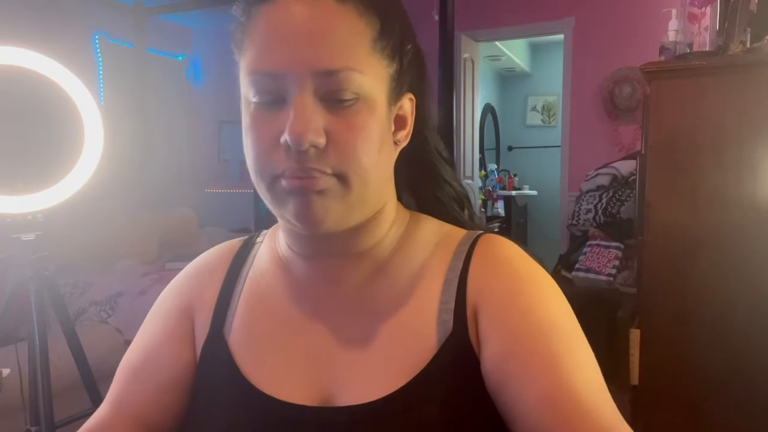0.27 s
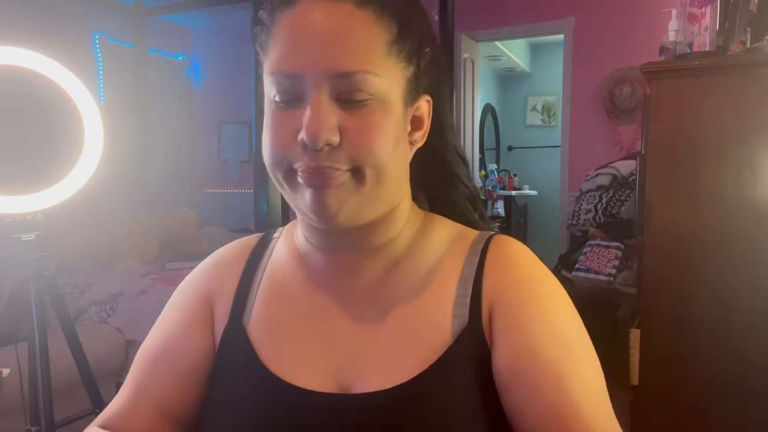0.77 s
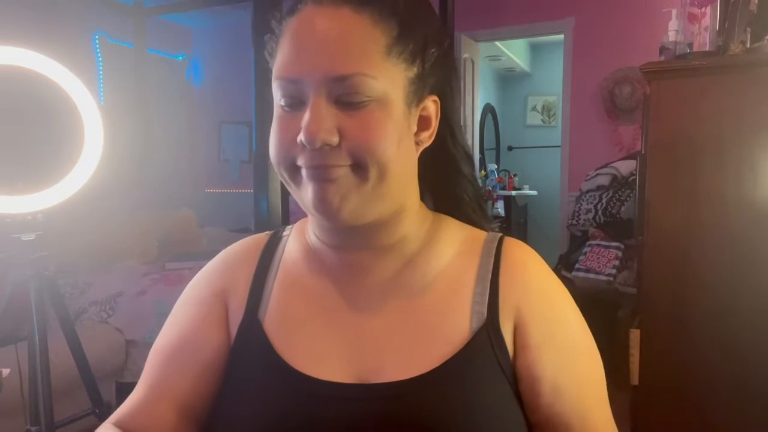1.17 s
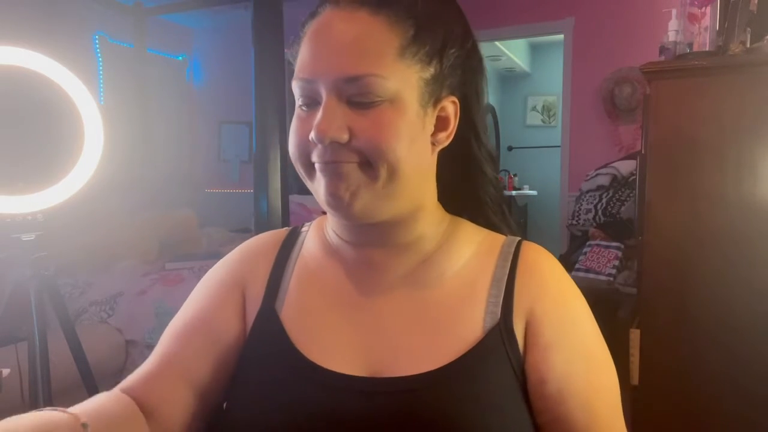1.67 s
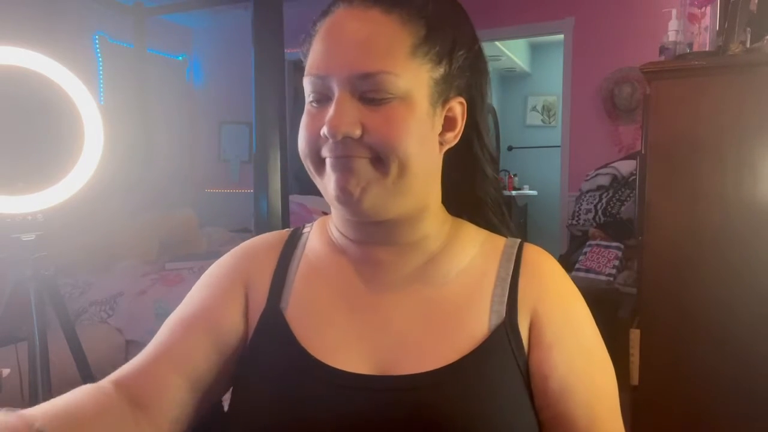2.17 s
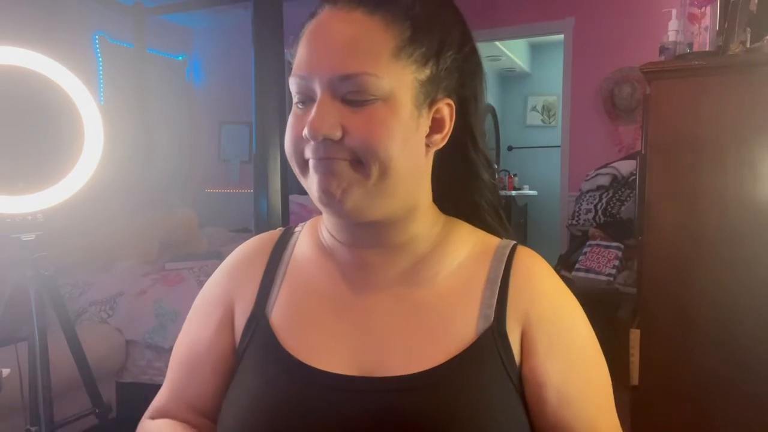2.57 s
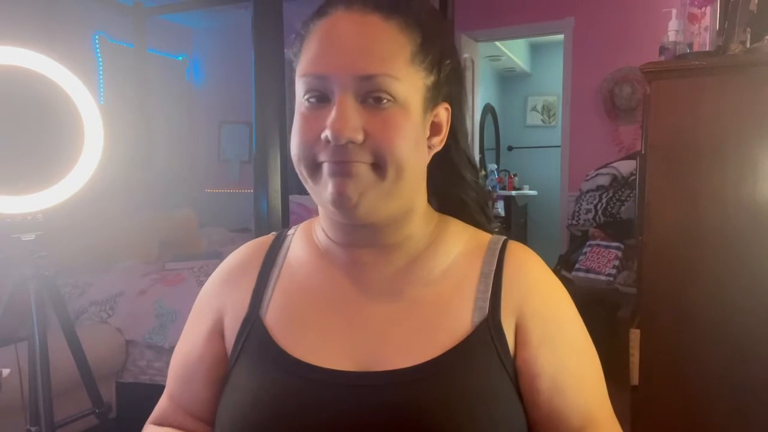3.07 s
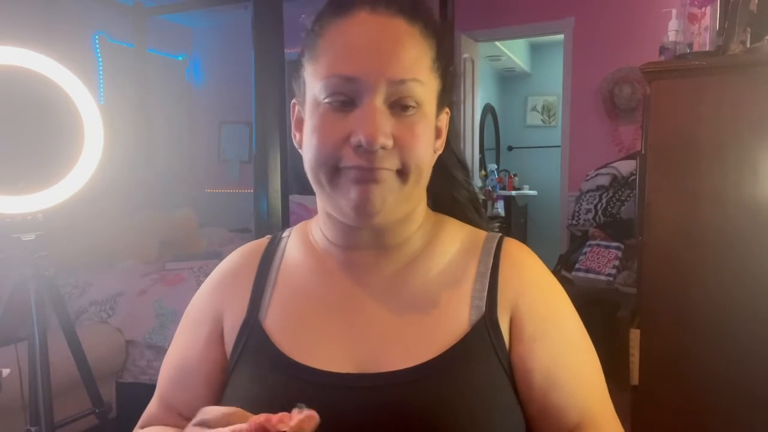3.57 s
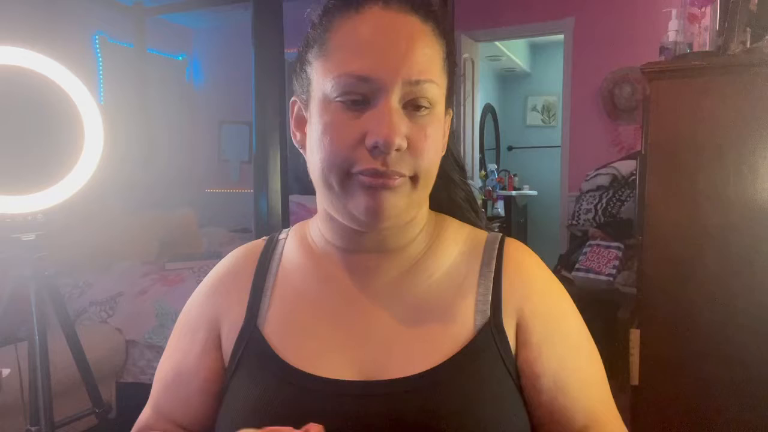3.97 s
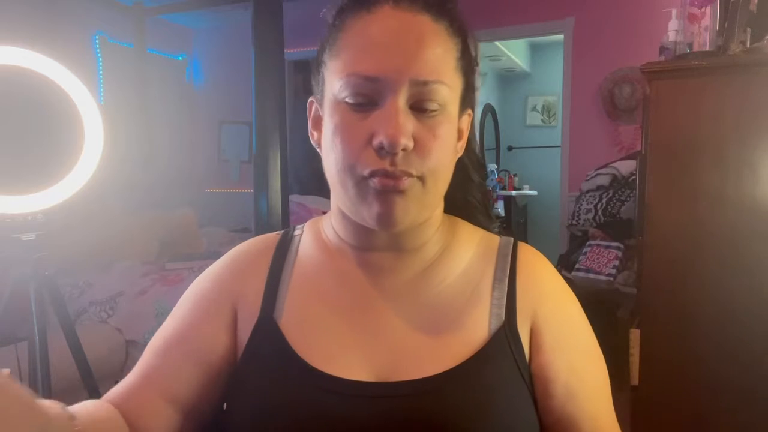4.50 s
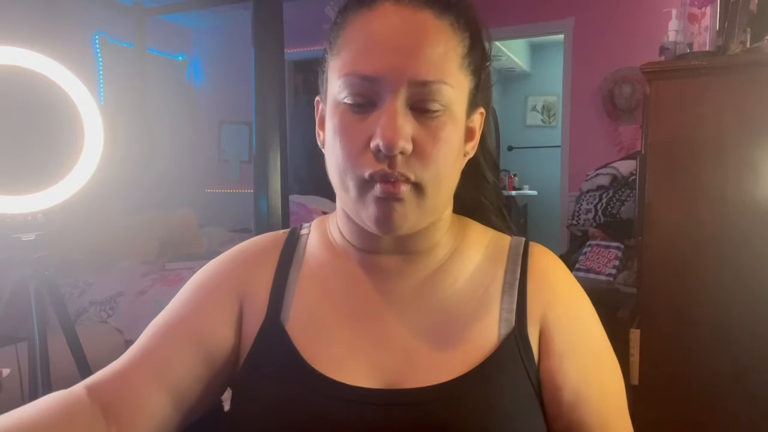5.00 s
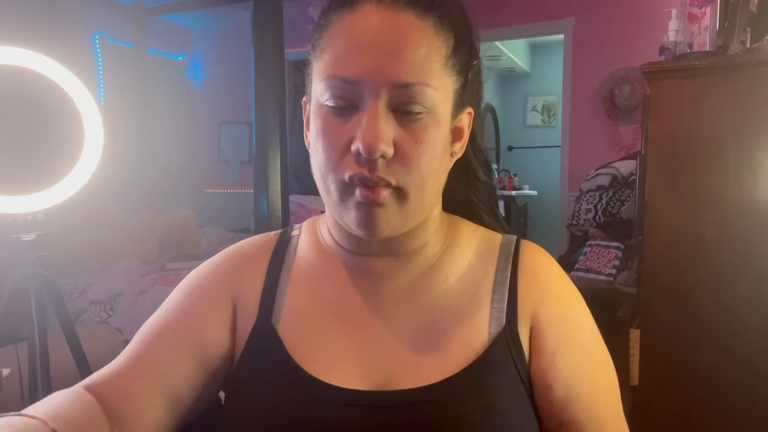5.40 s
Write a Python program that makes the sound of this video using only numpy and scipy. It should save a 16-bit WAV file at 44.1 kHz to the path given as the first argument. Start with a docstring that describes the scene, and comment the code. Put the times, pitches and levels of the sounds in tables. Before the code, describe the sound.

Close desk handling: busy scuffs and ticks at first, sparse light taps, near silence with faint hum, then a sudden loud scrape and knocks.

```python
"""Small items handled on a desk

Items slide, squeak, tick and knock on a desk top in a small room: shaped noise rubs, impulses ring damped modes.
Arms brush along and fingers rasp on a small item; a fan motor hums as drifting harmonics over rumble and air.
Two close microphone ports hear it with echoes; the left one is nearer to the hands."""
import sys
import numpy as np
from scipy import signal
from scipy.fft import rfft, irfft, next_fast_len
from scipy.io import wavfile

SR = 44100
rng = np.random.default_rng(int(sys.argv[2]) if len(sys.argv) > 2 else 0)


def dump(signal):
    """Clip the signal to [-1, 1] and save it as 16-bit WAV at the path in sys.argv[1]."""
    limited = np.clip(np.atleast_2d(signal).T, -1, 1)
    pcm = np.round(limited * 32767).astype(np.int16)
    wavfile.write(sys.argv[1], SR, pcm)


N = 248792
TIME_S = np.arange(N) / SR

# All levels are relative; the levels in scene() add to them.
# desk top under a sliding thing: f/Hz, density/dB per Hz
SCRAPE_SPECTRUM = [(70, -2), (150, -4.5), (240, 3.5), (350, 5.5), (460, 0), (600, 0.5), (850, 0.5),
                   (1100, -3), (1500, -4), (2100, -19), (2800, -5.5), (3800, -15), (6000, -12),
                   (15000, -48.5)]
# surface hiss: f/Hz, density/dB per Hz
HISS_SPECTRUM = [(600, -22), (2000, -4.5), (2800, -4), (4000, -4.5), (5200, -2), (7200, 2), (8500, 0.5),
                 (10500, -19.5), (12500, -1.5), (14500, 1.5), (16000, -9.5)]
# pushes over the desk: start t/s, attack/s, length/s, scrape level/dB, hiss level/dB
PUSHES = [(0, 0.003, 0.05, -55, -55), (0.043, 0.016, 0.19, -47, -46.5), (0.157, 0.0062, 0.023, -53, -56),
          (0.177, .01, 0.01, -50, -54), (0.243, 0.03, 0.084, -44.5, -50),
          (0.366, 0.011, 0.02, -43.5, -51.5), (0.396, .018, 0.034, -48.5, -51),
          (0.46, 0.0046, 0.097, -55, -58), (0.534, 0.016, 0.021, -44.5, -56.5),
          (0.575, 0.0057, 0.13, -49, -52), (0.638, .015, 0.05, -57.5, -54), (0.747, 0.032, 0.18, -56, -64),
          (0.959, 0.017, 0.31, -60, -63.5), (1.24, 0.028, 0.034, -48, -55), (1.279, .015, 0.027, -52, -44),
          (1.344, .012, 0.026, -57, -57.5), (1.893, 0.012, 0.1, -68, -66.5),
          (1.998, 0.022, 0.28, -66, -69.5), (2.097, 0.036, 0.12, -57, -49),
          (2.294, 0.011, 0.024, -56.5, -52.5), (4.582, 0.0099, 0.098, -54, -58),
          (4.61, 0.012, 0.048, -61, -57), (4.801, .009, 0.02, -55.5, -57),
          (4.846, .009, 0.029, -70.5, -64.5), (5.024, 0.025, 0.057, -73.5, -77.5),
          (5.226, 0.0096, 0.019, -60.5, -65), (5.242, 0.01, 0.028, -56, -52.5),
          (5.428, 0.034, 0.04, -63, -54.5), (5.455, 0.01, .02, -43.5, -46.5),
          (5.473, 0.0064, 0.026, -35.5, -35.5), (5.504, 0.006, 0.024, -43, -34.5),
          (5.526, 0.0073, 0.01, -42, -35), (5.571, 0.015, 0.015, -40.5, -47.5),
          (5.608, 0.014, 0.048, -52.5, -55.5)]
# arm swings out or back, brushing along: middle t/s, length/s, scrape level/dB, hiss level/dB
ARM_BRUSHES = [(2.202, 0.11, -57, -58.5), (2.566, 0.14, -90, -66.5), (2.862, 0.072, -79.5, -73.5),
               (3.09, 0.2, -80.5, -74.5), (3.946, 0.3, -95, -83.5), (4.556, 0.37, -86, -66.5)]
# fan motor speed: t/s, speed/turns per s
FAN_SPEED = [(0, 25.63), (2.85, 25.65), (3.05, 25.1), (3.25, 25.25), (3.45, 25.7), (3.7, 25.8),
             (4.9, 25.76), (5.3, 25.45), (5.64, 25.6)]
# fan harmonics: multiple, level/dB rms, left-right/dB, left lead/rad, slope/dB per extra turn per s
FAN_HARMONICS = [(1, -78, 14, 0.47, 1.5), (2, -58, 3, 0.43, 1.5), (3, -70.5, -1.5, 0.3, 3.5),
                 (4, -68, 3, 0.57, 3.5), (5, -57.5, -2, -0.39, -5.5), (6, -54.5, -8.5, -0.82, 10.5),
                 (7, -63.5, -0.5, 0.099, -2.5), (8, -63.5, 1.5, 0.82, 3), (9, -65.5, -8.5, 0.75, 3.5),
                 (10, -69, -8.5, -0.87, 0), (12, -71, 3, -0.71, -5), (13, -71, -2, -1.21, -1.5)]
# room rumble: f/Hz, density/dB per Hz
RUMBLE_SPECTRUM = [(15, -16), (32, -19), (41, -2), (54, 8), (64, -12.5), (78, -2), (110, -12), (200, -19),
                   (330, -19.5), (385, -37.5), (600, -55.5), (1500, -85)]
# faint air: f/Hz, density/dB per Hz
AIR_SPECTRUM = [(100, 15), (450, 14.5), (800, 8.5), (1300, 6), (1800, 5.5), (2500, 0.5), (8500, -3),
                (11000, -37.5), (14000, 1), (16000, -1)]
# small hard parts touching: t/s, click peak/dB, snap peak/dB, f/Hz
TICK_EVENTS = [(0.057, -41, -34.5, 3460), (0.2555, -22, -29, 6300), (0.3034, -21.5, -33.5, 8300),
               (0.385, -27, -35, 6660), (0.39, -28, -46, 4270), (0.4175, -22.5, -55, 6800),
               (0.422, -29, -49, 7300), (0.462, -26.5, -36.5, 6900), (0.778, -27.5, -44, 5960),
               (0.787, -44, -50, 7300), (0.8276, -36, -32, 5550), (0.9073, -30, -39, 4370),
               (0.9663, -38, -44, 7200), (0.9698, -34.5, -45, 6600), (1.0246, -26, -47, 3640),
               (1.067, -32, -44.5, 5830), (1.193, -34.5, -60, 5900), (1.2584, -32, -50, 7500),
               (1.279, -27.5, -54, 7160), (1.303, -29, -56, 6000), (1.432, -46, -71, 3700),
               (1.503, -46, -57, 3800), (1.7382, -46.5, -75, 6000), (1.8145, -34, -46, 4570),
               (2.037, -51, -52, 7000), (2.139, -46, -34, 8100), (2.2991, -45.5, -38, 5000),
               (2.3303, -35, -49, 7730), (2.334, -46, -42, 8000), (2.5366, -26, -40, 6860),
               (2.5447, -35, -51, 6500), (2.83, -41.5, -52.5, 4640), (3.707, -57, -59.5, 8100),
               (3.742, -56.5, -69, 7000), (4.5875, -32, -41, 5800), (4.654, -36, -44, 6560),
               (4.879, -48, -68, 3970), (5.24, -47.5, -58, 5304), (5.6365, -34, -36, 7800)]
# short juddering catches or squeaks of a rubbed thing, each at one gliding pitch:
# start t/s, length/s, level/dB, first f/Hz, last f/Hz
CATCH_EVENTS = [(0.1, 0.025, -54, 3230, 3810), (0.127, 0.011, -46.5, 300, 330),
                (0.139, 0.01, -35, 830, 763), (0.152, 0.016, -49.5, 1100, 1290),
                (0.288, 0.021, -43.5, 288, 368), (0.305, 0.05, -51, 620, 566),
                (0.308, 0.013, -53, 3740, 3400), (0.318, 0.025, -60, 1360, 1190),
                (0.546, 0.027, -55, 1300, 1440), (0.585, 0.0091, -43.5, 680, 620),
                (0.588, 0.066, -61, 3480, 3700), (0.642, 0.026, -54, 2780, 2850),
                (0.646, 0.037, -52.5, 1300, 1510), (0.669, 0.019, -54, 680, 600),
                (1.094, 0.0065, -39.5, 2300, 2045), (1.983, 0.15, -70, 630, 810),
                (2.192, 0.071, -70, 774, 590), (2.147, 0.16, -71, 2530, 2600),
                (3.34, 0.021, -79, 2090, 1700), (3.414, 0.011, -68.5, 1700, 1750),
                (3.473, 0.023, -79, 1720, 1530), (3.527, 0.016, -69.5, 1660, 1800),
                (4.654, 0.0095, -59.5, 2700, 2560), (4.815, 0.0063, -51, 890, 633),
                (4.854, 0.0072, -70, 4050, 4100), (5.243, 0.03, -61.5, 5200, 5700),
                (5.468, 0.012, -38, 533, 646), (5.483, 0.02, -44.5, 2740, 2890),
                (5.485, 0.036, -51.5, 1900, 1960), (5.505, 0.027, -37.5, 582, 530),
                (5.557, 0.04, -51, 2680, 2810), (5.593, 0.019, -51.5, 554, 530)]
# things put down or bumped: t/s, clack level/dB, clack t60/s, brightness f/Hz, item level/dB, desk level/dB
KNOCK_EVENTS = [(0.14, -27, 0.036, 1200, -62, -44), (0.293, -36, 0.046, 690, -56, -46.5),
                (0.33, -26, .04, 1500, -65, -54), (0.385, -38, .03, 2500, -60, -59),
                (0.586, -33.5, 0.043, 900, -50, -38), (0.675, -34, 0.056, 1500, -49.5, -44),
                (0.708, -37, 0.019, 900, -61, -45), (1.0984, -34.5, 0.026, 4970, -49.5, -51),
                (1.104, -29, 0.047, 11100, -40.5, -41.5), (1.111, -43, 0.035, 9000, -57, -51),
                (1.303, -31.5, 0.026, 12100, -64, -50), (1.308, -34, .025, 10000, -60, -54),
                (1.8145, -29, 0.024, 9900, -50.5, -48), (1.8199, -30.5, 0.078, 2800, -62, -36.5),
                (1.846, -37.5, 0.066, 3780, -65, -58), (1.889, -40.5, 0.055, 3000, -71, -54.5),
                (2.197, -44, .03, 5000, -70, -51), (2.538, -40.5, 0.029, 4050, -62, -52),
                (4.577, -42, .03, 7000, -69, -52.5), (4.591, -40, .05, 2000, -73, -47),
                (4.643, -44, 0.037, 3020, -66, -68), (4.8144, -45, .03, 5000, -75, -58),
                (4.8205, -41.5, .04, 1400, -66, -54), (5.472, -26, .035, 1500, -50.5, -65),
                (5.4848, -21, .025, 6500, -47, -51), (5.5075, -20.5, .025, 2480, -54, -37),
                (5.581, -33.5, 0.035, 2000, -66, -52)]
# clack colour: f/Hz, gain/dB
CLACK_SPECTRUM = [(100, -6), (300, 2), (900, 6.5), (1800, -5), (3000, -4.5), (4500, -4), (6500, -9.5),
                  (8500, -9), (11000, -19), (16000, -17.5)]
# modes of a small container: f/Hz, level/dB, t60/s
ITEM_MODES = [(328, -9.5, 0.17), (389, -4.5, 0.08), (694.4, -2.5, 0.16), (858, -12, 0.081),
              (1417, -15.5, 0.04), (1541, -9, 0.045), (1893, -4.5, 0.078), (2076, -4.5, 0.047),
              (2260, -10.5, 0.03), (2595, -2.5, 0.057), (4610, -9.5, 0.025), (5550, -6, 0.008),
              (6000, -2, 0.009), (6700, -4, 0.0082)]
# modes of the desk: f/Hz, level/dB, t60/s
DESK_MODES = [(63, -7.5, 0.45), (105, -4.5, 0.27), (154.6, -5, 0.12), (257, -8, 0.0654), (314, 1.5, 0.069),
              (326, -8.5, 0.043), (450, -4.5, 0.012), (559, -4.5, 0.064), (810, -7, 0.021)]
# fingers turning a small item: start t/s, length/s, level/dB
FINGER_SLIPS = [(3.266, 0.014, -81), (3.333, 0.024, -84), (3.375, 0.14, -75.5), (3.412, 0.014, -75),
                (3.529, 0.014, -65), (3.58, 0.068, -84)]
# resonances of the held item: f/Hz, level/dB, width/Hz
HELD_ITEM_MODES = [(1720, -7, 220), (3180, -7, 410), (3760, -4.5, 480), (4800, -5, 1200)]
# right port against left: f/Hz, lag/rad, shading/dB
RIGHT_PORT_PATH = [(0, -1.5, 4), (500, 2.15, -7), (840, 1.96, -6), (990, 3.5, -4), (1200, 4, -4.5),
                   (2330, 4.5, 0.5), (4820, 5, -9), (4900, 11, -5), (8550, 10.5, 4), (10340, 9, 0.5),
                   (13700, 10, 1.5), (14550, 10.5, -5)]
# changing echoes against direct sound: f/Hz, level/dB
SCATTER_SPECTRUM = [(200, -16.5), (1000, -7), (2800, -6), (4500, -5), (7000, -11), (11000, -38),
                    (14500, -11)]

CUTOFF_HZ, ROOM_T60_S = 16000, 0.32
CRUMBS_PER_S, GRIT_PER_S = 420, 55
PUSH_RELEASE_T60_S, CATCH_RELEASE_T60_S = 0.14, 0.04
GRIP_ATTACK_S = 0.0031  # catches and fingertips


def from_db(db):
    """Decibels to gain."""
    return 10 ** (np.asarray(db) / 20)


def rms_one(x):
    """Scales x to rms 1."""
    return x / np.sqrt(np.mean(x ** 2) + 1e-20)


def in_time(rows):
    """Columns of a curve table, sample by sample."""
    t_s, *columns = np.transpose(rows)
    return [np.interp(TIME_S, t_s, column) for column in columns]


def filtered(x, edge_hz, kind):
    """Second-order Butterworth design."""
    return signal.sosfilt(signal.butter(2, edge_hz, kind, fs=SR, output="sos"), x)


def coloured(x, spectrum):
    """Minimum-phase filter through a spectrum table, so nothing sounds early."""
    size = next_fast_len(N + SR // 4)
    size += size % 2
    hz, level_db = np.transpose(spectrum)
    grid_hz = np.maximum(np.fft.rfftfreq(size, 1 / SR), 1)
    gain = from_db(np.interp(np.log(grid_hz), np.log(hz), level_db))
    cepstrum = irfft(np.log(gain))
    # fold onto positive times: minimum phase
    cepstrum[1:size // 2] *= 2
    cepstrum[size // 2 + 1:] = 0
    return irfft(rfft(x, size) * np.exp(rfft(cepstrum)))[..., :N]


def unit_in_band(x, band_hz):
    """Scales x to rms 1 inside a band."""
    return x / np.std(filtered(x, band_hz, "band"))


def drift(knots_per_s):
    """Straight lines between random knots of spread 1."""
    knots = rng.standard_normal(4096)
    return np.interp(TIME_S * knots_per_s, np.arange(len(knots)), knots)


def ring(clicks, hz, t60_s):
    """Two-pole resonator: a unit click starts a decaying sine of height 1."""
    radius = from_db(-60 / (t60_s * SR))
    angle = 2 * np.pi * hz / SR
    feedback = [1, -2 * radius * np.cos(angle), radius * radius]
    return signal.lfilter([0, np.sin(angle)], feedback, clicks + 1e-18)


def dying(t_s, t60_s):
    """Amplitude that falls 60 dB in t60."""
    return np.exp(-np.log(1000) * t_s / t60_s)


def random_signs(shape):
    """Random +1 and -1."""
    return rng.choice([-1., 1.], shape)


def random_hits(count, per_s):
    """Samples hit at random at a mean rate."""
    return rng.random(count) < per_s / SR


def add(track, start_s, sound):
    """Mixes a sound into a track at a time."""
    start = round(start_s * SR)
    track[start:start + len(sound)] += sound[:N - start]


def push(start_s, attack_s, length_s, release_t60_s=PUSH_RELEASE_T60_S):
    """Strength of one push: squared rise, hold, exponential release."""
    after_s = np.maximum(TIME_S - start_s - length_s, 0)
    return np.clip((TIME_S - start_s) / attack_s, 0, 1) ** 2 * dying(after_s, release_t60_s)


def swing(middle_s, length_s):
    """Strength of one arm swing: a smooth bell."""
    return np.exp(-2 * ((TIME_S - middle_s) / length_s) ** 2)


def rubbing_strength():
    """Scrape and hiss amplitudes of all pushes and swings, summed in power."""
    power = np.zeros((2, N))
    for shape, rows in ((push, PUSHES), (swing, ARM_BRUSHES)):
        for *timing, scrape_db, hiss_db in rows:
            power += (from_db([[scrape_db], [hiss_db]]) * shape(*timing)) ** 2
    return np.sqrt(power)


def friction(slips_per_s, spread_db, smooth_share, patchy_db):
    """Uneven tiny slips over a smooth rush, in three rows: direct, left echo, right echo."""
    # slip times, slip sizes and the band-level drift are shared by the rows; the noise differs
    size = from_db(spread_db * np.minimum(rng.exponential(1, N), 3))
    slips = random_hits(N, slips_per_s) * size
    rush = rms_one(slips * rng.standard_normal((3, N))) + smooth_share * rng.standard_normal((3, N))
    # as the contact moves on, other resonances come and go
    centres_hz = np.geomspace(250, 14000, num=16)
    fft_size = next_fast_len(N)
    log_hz = np.log(np.maximum(np.fft.rfftfreq(fft_size, 1 / SR), 1))
    spectrum, out = rfft(rush, fft_size), 0
    for shares in np.eye(len(centres_hz)):
        weight = np.interp(log_hz, np.log(centres_hz), shares)
        band = irfft(spectrum * weight, fft_size)[:, :N]
        out = out + band * from_db(patchy_db * drift(28))
    return out


def sliding(scrape_db, hiss_db, judder_db, pressure_db):
    """Slips shake the desk top and the surfaces hiss, under a wavering, juddering pressure."""
    scrape_strength, hiss_strength = rubbing_strength()
    scrape = friction(slips_per_s=1500, spread_db=2.0, smooth_share=0.78, patchy_db=0.5)
    hiss = friction(slips_per_s=4300, spread_db=5.5, smooth_share=0.8, patchy_db=4.0)
    scrape = unit_in_band(coloured(scrape, SCRAPE_SPECTRUM), [350, 2000])
    hiss = unit_in_band(coloured(hiss, HISS_SPECTRUM), [4500, 9000])
    rub = scrape * scrape_strength * from_db(scrape_db) + hiss * hiss_strength * from_db(hiss_db)
    return rub * from_db(judder_db * drift(110) + pressure_db * drift(27))


def crumbs(level_db, spread_db, cycles):
    """Coarse slips crackle in the scrape, each ringing briefly at one of 14 pitches."""
    pitches_hz = np.geomspace(600, 3800, num=14)
    size = from_db(spread_db * rng.uniform(-1.2, 1, N))
    cracks = random_hits(N, CRUMBS_PER_S) * random_signs(N) * size
    dealt = rng.integers(0, len(pitches_hz), N)
    crackle = sum(ring(cracks * (dealt == k), hz, cycles / hz) for k, hz in enumerate(pitches_hz))
    return rms_one(crackle) * rubbing_strength()[0] * from_db(level_db)


def grit(level_db):
    """Grit under a sliding thing: lone bright cracks that follow the hiss strength."""
    cracks = random_hits(N, GRIT_PER_S) * random_signs(N) * rng.uniform(.5, 1, N)
    return rms_one(coloured(cracks, HISS_SPECTRUM)) * rubbing_strength()[1] * from_db(level_db)


def fan(level_db, waver_db, scatter_rad, wander_rad):
    """Harmonics of the turning speed, loosely in step; room resonances swell or fade them as it changes."""
    speed, = in_time(FAN_SPEED)
    turn_rad = 2 * np.pi * np.cumsum(speed) / SR + rng.uniform(0, 2 * np.pi)
    offsets_rad = np.cumsum(scatter_rad * random_signs(len(FAN_HARMONICS)))
    out, sides = np.zeros((2, N)), np.array([[.5], [-.5]])
    for (multiple, line_db, pan_db, lead_rad, slope), offset_rad in zip(FAN_HARMONICS, offsets_rad):
        phase = round(multiple) * turn_rad + offset_rad + wander_rad * drift(4.4) + sides * lead_rad
        swell_db = slope * (speed - speed.mean()) + waver_db * drift(3)
        gain = from_db(line_db + level_db + sides * pan_db + swell_db)
        out += np.sqrt(2) * np.cos(phase) * gain
    return out


def background(rumble_db, rumble_side_db, air_db, port_noise_db):
    """Rumble nearly alike at both ports; faint air from the room and from each port itself."""
    mid, side = rms_one(coloured(rng.standard_normal((2, N)), RUMBLE_SPECTRUM))
    rumble = mid + from_db(rumble_side_db) * side * np.array([[1], [-1]])
    air = rms_one(coloured(rng.standard_normal((3, N)), AIR_SPECTRUM))
    room_air = from_db(air_db) * ports(air[0])
    return from_db(rumble_db) * rumble + room_air + from_db(port_noise_db) * air[1:]


def ticks(click_db, snap_db, attack_s, click_t60_s, snap_t60_s, ring_t60_s, ring_share, low_edge_share):
    """Each tick is a short noise click with a heavily damped resonance, topped by a snap above 9 kHz."""
    out, t_s = np.zeros(N), TIME_S[:SR // 25]
    for when_s, click_level_db, snap_level_db, hz in TICK_EVENTS:
        rough = random_signs((2, len(t_s))) * np.minimum(t_s / attack_s, 1)
        click = filtered(rough[0] * dying(t_s, click_t60_s), [low_edge_share * hz, 9500], "band")
        click = rms_one(click) + ring_share * rms_one(ring(click, hz, ring_t60_s))
        snap = filtered(rough[1] * dying(t_s, snap_t60_s), 9000, "high")
        add(out, when_s, click / np.abs(click).max() * from_db(click_level_db + click_db))
        add(out, when_s, snap / np.abs(snap).max() * from_db(snap_level_db + snap_db))
    return out


def catches(width_hz, width_share, slips_per_s):
    """Quick random slips keep one damped resonance going while its pitch glides."""
    out, t_s = np.zeros(N), TIME_S[:SR // 3]
    for when_s, length_s, level_db, start_hz, end_hz in CATCH_EVENTS:
        slips = random_hits(len(t_s), slips_per_s) * random_signs(len(t_s))
        glide_hz = np.interp(t_s, [0, length_s], [start_hz, end_hz])
        turning = np.exp(2j * np.pi * np.cumsum(glide_hz) / SR)
        keep = np.exp(-np.pi * (width_hz + width_share * start_hz) / SR)
        # a one-pole filter in the rotating frame is a gliding resonator
        judder = np.real(turning * signal.lfilter([1], [1, -keep], slips / turning + 1e-18))
        grip = push(0, GRIP_ATTACK_S, length_s, CATCH_RELEASE_T60_S)[:len(t_s)]
        add(out, when_s, rms_one(judder) * grip * from_db(level_db))
    return out


def struck(modes, times_s, levels_db, chatter_db, chatter_t60_s):
    """Blows set a body ringing; a dying chatter of tiny contacts keeps it going as it settles."""
    out, t_s = 0, TIME_S[:SR // 4]
    for k, (hz, mode_db, t60_s) in enumerate(modes):
        blows = np.zeros(N)
        for when_s, level_db in zip(times_s, levels_db):
            force = rng.standard_normal(len(t_s)) * dying(t_s, chatter_t60_s)
            force *= from_db(chatter_db) / np.linalg.norm(force)
            force[0] = 1  # the blow itself
            add(blows, when_s, force * from_db(level_db + mode_db))
        out = out + (-1) ** k * ring(blows, hz, t60_s)
    return out


def knocks(clack_db, tap_db, tap_t60_s, item_db, desk_db):
    """Each contact is a tap and a rough clack, low-passed by its softness, that rings item and desk."""
    contact, t_s = np.zeros(N), TIME_S[:SR // 4]
    for when_s, level_db, t60_s, bright_hz, _, _ in KNOCK_EVENTS:
        envelope = dying(t_s, t60_s) + from_db(tap_db) * dying(t_s, tap_t60_s)
        rough = random_signs(len(t_s)) * envelope
        softened = filtered(rough, min(bright_hz, CUTOFF_HZ), "low")
        add(contact, when_s, softened * from_db(level_db + clack_db))
    times_s, *_, item_level_db, desk_level_db = np.transpose(KNOCK_EVENTS)
    item = struck(ITEM_MODES, times_s, item_level_db + item_db, chatter_db=3.0, chatter_t60_s=0.12)
    desk = struck(DESK_MODES, times_s, desk_level_db + desk_db, chatter_db=-5, chatter_t60_s=0.065)
    return coloured(contact, CLACK_SPECTRUM) + item + desk


def resonances(x, modes):
    """Broad resonances side by side; white noise of rms 1 brings each to its level."""
    out = 0
    for k, (hz, level_db, width_hz) in enumerate(modes):
        gain = from_db(level_db) * np.sqrt(4 * np.pi * width_hz / SR)
        out = out + (-1) ** k * gain * ring(x, hz, np.log(1000) / (np.pi * width_hz))
    return out


def fingering(level_db, slips_per_s):
    """Fingertips slip over a small hollow item and make it rasp softly."""
    slips = rms_one(random_hits(N, slips_per_s) * rng.standard_normal(N))
    grip = sum(push(start_s, GRIP_ATTACK_S, length_s) * from_db(rub_db)
               for start_s, length_s, rub_db in FINGER_SLIPS)
    return resonances(slips * grip, HELD_ITEM_MODES) * from_db(level_db)


def ports(x):
    """Left port as is; right port with frequency-dependent phase lag and shading."""
    hz, lag_rad, shade_db = np.transpose(RIGHT_PORT_PATH)
    grid_hz = np.fft.rfftfreq(N, 1 / SR)
    path = from_db(np.interp(grid_hz, hz, shade_db)) * np.exp(-1j * np.interp(grid_hz, hz, lag_rad))
    return np.array([x, irfft(rfft(x) * path, N)])


def reflections(x, level_db, t60_s, delay_s, low_hz, high_hz):
    """Dense echoes as decaying noise, different at each port."""
    t_s = TIME_S[:SR // 2]
    echoes = rng.standard_normal((2, len(t_s))) * dying(t_s, t60_s) * (t_s > delay_s)
    echoes = echoes / np.linalg.norm(echoes, axis=1, keepdims=True)
    echoes = filtered(echoes, [low_hz, high_hz], "band")
    return from_db(level_db) * signal.fftconvolve(x[None], echoes, axes=1)[:, :N]


def scene():
    """Handling on the desk, direct and through the room, over hum and background."""
    rub = sliding(scrape_db=-4.0, hiss_db=-3.5, judder_db=1.27, pressure_db=0.37)
    rub = rub + catches(width_hz=40, width_share=0.036, slips_per_s=900)
    rub = rub + crumbs(level_db=-9.5, spread_db=8.5, cycles=5.0)
    # echoes of a moving thing keep changing: their friction noise differs at the two ports
    scatter = coloured(rub[1:], SCATTER_SPECTRUM)
    handling = rub[0] + knocks(clack_db=-2.5, tap_db=4.0, tap_t60_s=0.0078, item_db=-1.0, desk_db=-2.0)
    handling = handling + fingering(level_db=-1.0, slips_per_s=1600)
    ticking = ticks(click_db=-3.0, snap_db=7.0, attack_s=0.00047, click_t60_s=0.0049, snap_t60_s=0.01,
                    ring_t60_s=0.003, ring_share=0.59, low_edge_share=0.56)
    ticking = ticking + grit(level_db=-11.5)
    near = reflections(handling + from_db(-3) * ticking, level_db=-6.0, t60_s=0.049,
                       delay_s=0.00083, low_hz=272, high_hz=8750)
    tail = reflections(handling + from_db(1) * ticking, level_db=-10.0, t60_s=ROOM_T60_S,
                       delay_s=0.0068, low_hz=223, high_hz=5410)
    hum = fan(level_db=-2, waver_db=0.7, scatter_rad=1.236, wander_rad=0.16)
    floor = background(rumble_db=-56.0, rumble_side_db=-15.0, air_db=-82.0, port_noise_db=-78.0)
    return ports(handling + ticking) + scatter + near + tail + hum + floor


def record(dry):
    """Steep elliptic low-pass at the cutoff."""
    return signal.sosfilt(signal.ellip(10, .1, 80, CUTOFF_HZ, fs=SR, output="sos"), dry)


dry = scene()
out = record(dry)
dump(out)
```